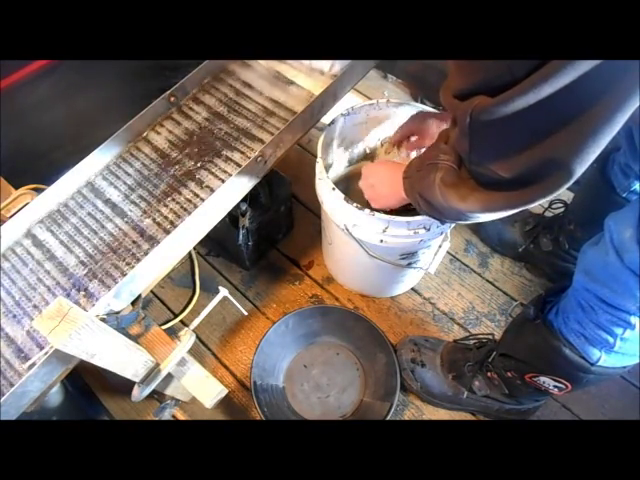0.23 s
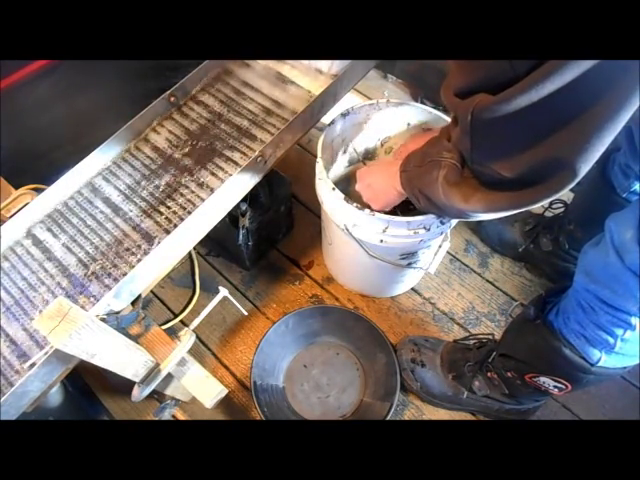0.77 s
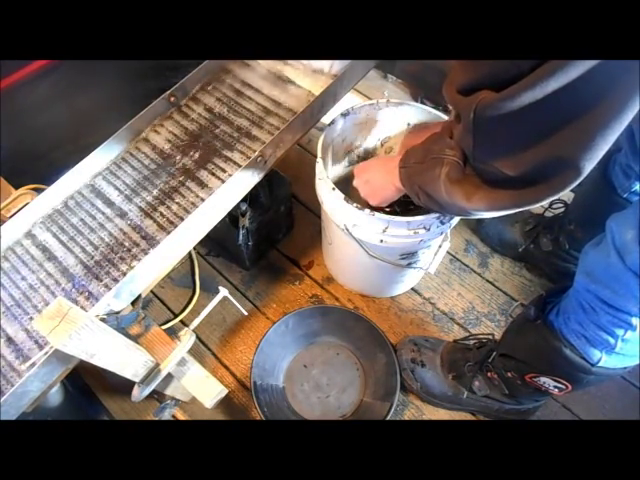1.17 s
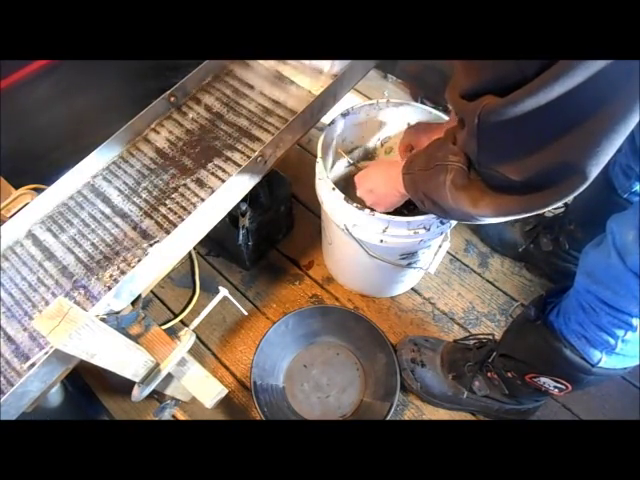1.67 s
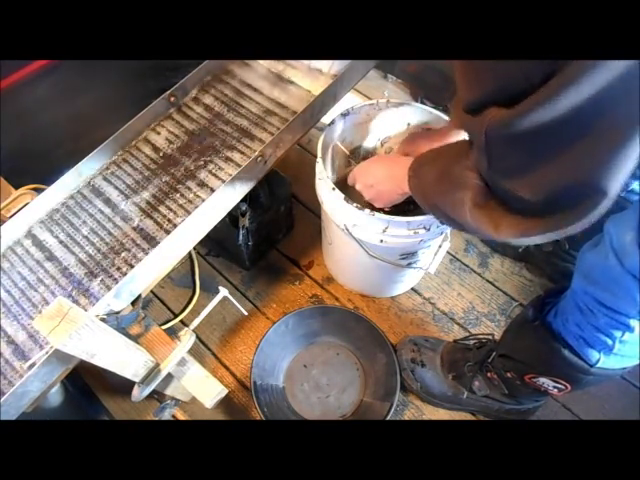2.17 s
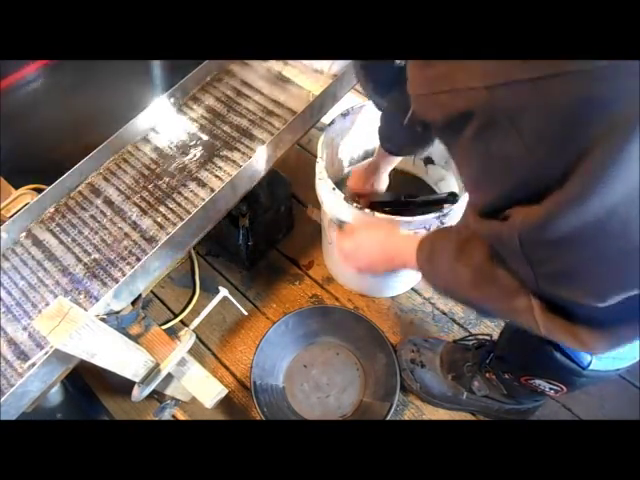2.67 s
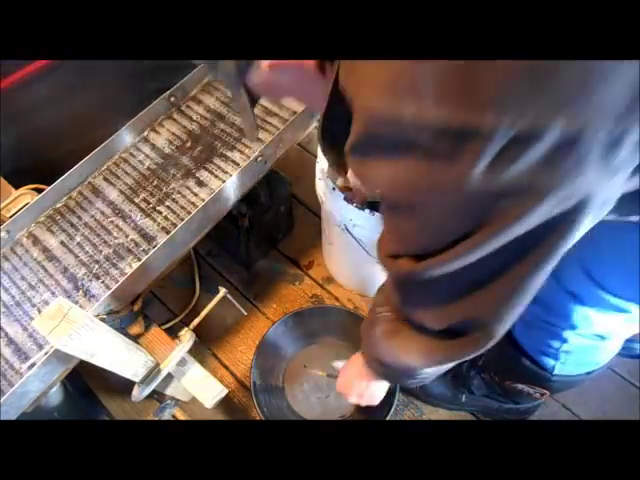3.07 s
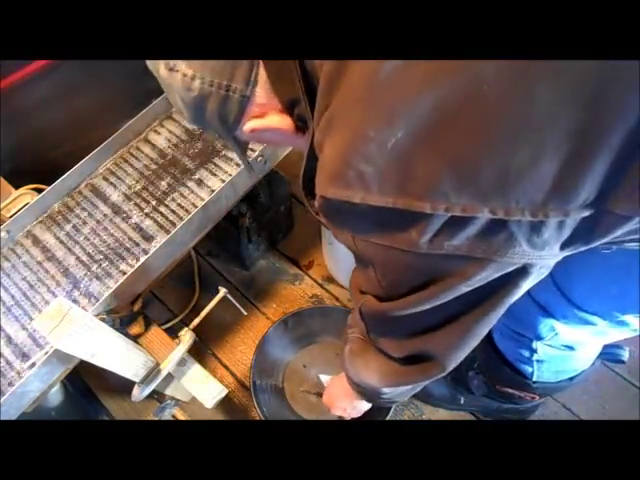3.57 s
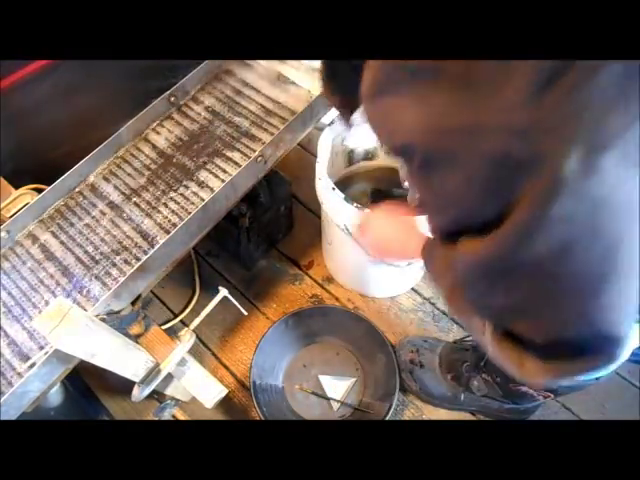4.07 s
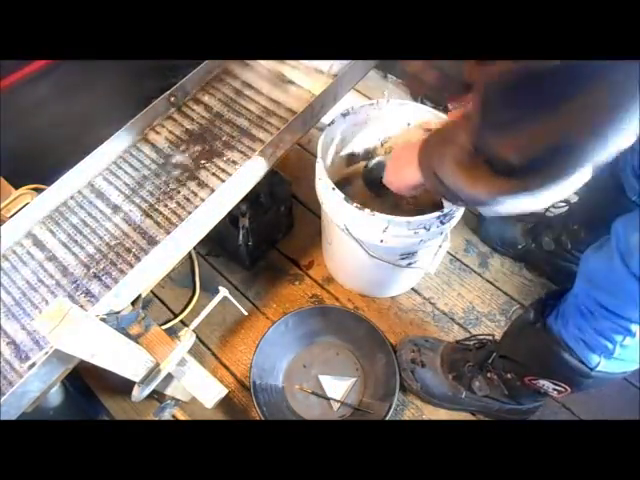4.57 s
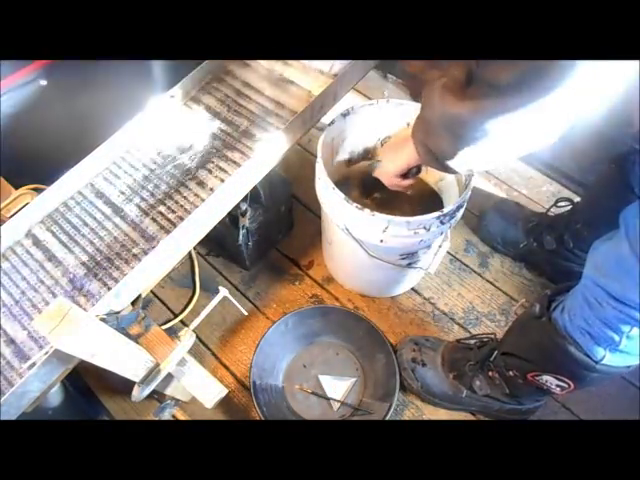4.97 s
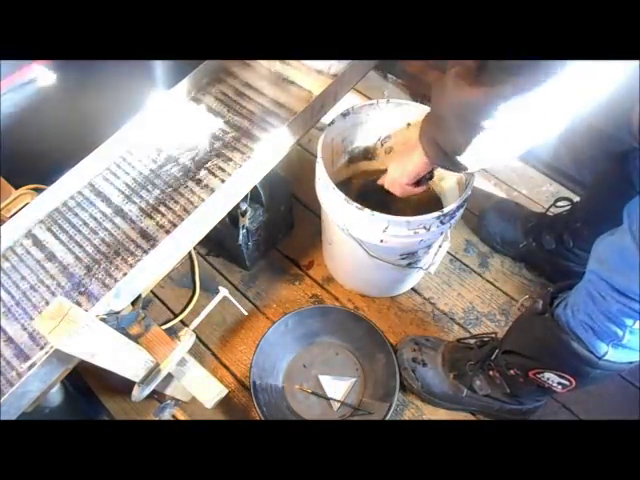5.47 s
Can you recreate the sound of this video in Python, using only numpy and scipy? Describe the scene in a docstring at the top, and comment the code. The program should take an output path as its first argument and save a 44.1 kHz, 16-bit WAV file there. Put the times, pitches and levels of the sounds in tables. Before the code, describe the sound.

Water rushes steadily down a metal sluice while a hand stirs gravel in a bucket, then a tool clacks sharply into a pan.

```python
"""Water rushes down a metal sluice over riffles: coloured noise and tiny bubbles, with resonances and gurgling.
A hand works gravel in a bucket: pebbles click as dying sines, bubbles and plops ring with rising pitch,
and noise bursts slosh and splash. A metal tool drops in a pan and both ring in their modes; boots and
boards thump, and a pump hums. One microphone hears it all; automatic gain pulls everything down
after each peak, holds, then recovers."""
import sys
import numpy as np
from scipy import signal
from scipy.io import wavfile
from scipy.ndimage import uniform_filter1d, minimum_filter1d

SR = 44100
rng = np.random.default_rng(int(sys.argv[2]) if len(sys.argv) > 2 else 0)


def master_out(mix):
    """Clip the mix to full scale and print it as 16-bit PCM to the path in sys.argv[1]."""
    frames = np.transpose(np.atleast_2d(mix))
    ceiling = np.clip(frames, -1, 1)
    pcm = np.round(ceiling * 32767).astype(np.int16)
    wavfile.write(sys.argv[1], SR, pcm)


N = 252119  # length in samples

# Level of the rush before the automatic gain, and its treble tilt.
# Each row: time in seconds, level in dB, treble tilt in dB.
FLOW = [(0, 2.5, -1), (.3, 3.5, 2.5), (.55, 0, 1.5), (0.9, 2.5, -1), (1.25, -1, 3), (1.6, -1, -0.5),
        (2.1, 0.2, 2), (2.4, 2.5, -0.5), (3.1, 0.9, 1.5), (3.45, 2, -0.5), (3.6, 3, -1), (3.8, 5, -0.5),
        (3.92, 3, -4.5), (4.2, 1.5, 0), (4.95, 2.2, 0), (5.15, 3, -0.5), (5.45, -2, 3.5), (5.72, 0.5, -3)]


def gain_of(db):
    """Decibels are logarithmic: 20 dB is a factor of ten in amplitude."""
    return 10 ** (np.asarray(db) / 20)


def evened(x):
    """Normalization by the root mean square sets the rms to 1."""
    return x / np.sqrt(np.mean(x ** 2) + 1e-20)


def add(mix, s, sound):
    """Superposition: a sound starting at s seconds adds to the mix."""
    part = mix[round(s * SR):][:len(sound)]
    part += sound[:len(part)]


def ring(hz, db, t60, rise=0.00022, glide=0.):
    """Damped oscillation: falls 60 dB in t60 (s), soft start; glide is the fractional pitch rise over t60."""
    t = np.arange(int(SR * .3)) / SR
    turns = hz * (t + glide * t ** 2 / (2 * t60))
    decay = gain_of(db - 60 * t / t60)
    onset = 1 - np.exp(-t / rise)
    return decay * onset * np.sin(2 * np.pi * turns)


def resonate(x, hz, width):
    """Second-order resonance: one band of the given width in Hz passes, at rms 1."""
    b, a = signal.iirpeak(hz, hz / width, SR)
    return evened(signal.lfilter(b, a, x))


def wander(hz):
    """Low-pass noise: averaging twice over 1/hz seconds leaves a slow random drift of rms 1."""
    points = int(SR / hz)
    once = uniform_filter1d(rng.standard_normal(N), points)
    return evened(uniform_filter1d(once, points))


def rush(level_db=-15.5, patchy_db=1.5, flicker_db=0.52, droplet_share=0.15):
    """Spectral shaping: noise and droplets share one colour, with drifting patches and flickering treble."""
    # Colour of the rush. Each row: frequency in Hz, relative level in dB.
    colour = [(15, -17), (25, -13), (59, -24.5), (91, -20), (177, -24), (253, -17), (420, -10), (698, -7),
              (1280, -3.5), (2820, -0.5), (4500, -2.5), (6100, -4.5), (7300, -4), (10000, -5),
              (12000, -6.5)]
    share = np.clip(droplet_share, 0, 1)  # share of the power
    drive = np.sqrt(1 - share) * rng.standard_normal(N) + np.sqrt(share) * droplets()
    hz, t, z = signal.stft(drive, SR, nperseg=1024, noverlap=896)
    mean_power = (abs(z) ** 2).mean(1)
    z /= uniform_filter1d(np.sqrt(mean_power), size=9)[:, None]  # whiten

    across_hz = uniform_filter1d(rng.standard_normal(z.shape), 12, 0)
    patches = evened(uniform_filter1d(across_hz, 18, 1))
    flicker = evened(uniform_filter1d(rng.standard_normal(len(t)), size=8))
    flicker_reach = (hz / (hz + 1000))[:, None]

    f, colour_level_db = np.transpose(colour)
    colour_db = np.interp(np.log(hz + 1), np.log(f), colour_level_db)[:, None]
    s, _, treble_db = np.transpose(FLOW)
    treble_reach = (hz ** 2 / (hz ** 2 + 3500 ** 2))[:, None]
    colour_db = colour_db + np.interp(t, s, treble_db) * treble_reach
    z *= gain_of(colour_db + patchy_db * patches + flicker_db * flicker * flicker_reach)
    shaped = signal.istft(z, SR, nperseg=1024, noverlap=896)[1][:N]
    return gain_of(level_db) * evened(shaped)


def droplets(per_s=3000, spread_db=2.5, cycles=4.8):
    """Shot noise: dense tiny bubbles of many pitches, each a few cycles long, add to a flat spectrum."""
    struck = rng.random(N) < per_s / SR
    size = gain_of(spread_db * np.minimum(rng.exponential(1, N), 5)) * struck
    kind, out = rng.integers(0, 30, N), np.zeros(N)
    for k, hz in enumerate(np.geomspace(450, 10500, num=30)):
        grain = ring(hz, 0, 2 * cycles / hz, rise=1 / hz, glide=0.37)[:3000]
        grain = grain / np.linalg.norm(grain) * np.sqrt(hz)  # equal power per Hz
        out += signal.oaconvolve(size * (kind == k), grain)[:N]
    return evened(out)


def hollows(gurgle_db=0.5):
    """Flow-excited resonance: gusty turbulence stirs the air in trough and pipe, whose tones waver."""
    # Air resonances. Each row: frequency in Hz, width in Hz, level in dB relative to that of the water.
    air_modes = [(250.3, 12, -49.5), (329, 75, -47), (468.2, 11.5, -40), (527, 10, -43.5), (869.7, 49, -34),
                 (2800, 640, -29.5)]
    out = np.zeros(N)
    for hz, width, db in air_modes:
        gusts = gain_of(db + gurgle_db * wander(52))
        out += gusts * resonate(rng.standard_normal(N), hz, width)
    return out


def gurgle(count=500, db=-33, spread_db=3.0):
    """Bubble resonance: larger bubbles at random times climb in pitch as they surface."""
    out = np.zeros(N)
    for start, pitch, size, length in rng.random((count, 4)):
        hz = 420 * 4.5 ** pitch
        t60 = (25 + 50 * length) / hz
        level_db = db - spread_db * np.log(size + 0.0067)  # few are loud
        add(out, start * N / SR, ring(hz, level_db, t60, rise=0.004, glide=0.21))
    return out


def pebbles(t60=0.0051, overtone=1.595, overtone_db=-5.5, grit_db=-22.5, grit_t60=.049):
    """Impact: each click is two strongly damped modes, followed by the noise of grit settling."""
    # Pebble clicks. Each row: start in seconds, level in dB, frequency in Hz.
    clicks = [(.526, -3, 2820), (.543, 8, 4600), (1.148, -0.5, 3230), (1.277, 4.5, 4170),
              (1.397, -1.5, 5890), (2.959, -3, 3000), (5.01, 0.9, 4200), (5.117, -3.5, 2760),
              (5.341, -2, 4150)]
    out, t = np.zeros(N), np.arange(2000) / SR
    for s, db, hz in clicks:
        add(out, s, ring(hz, db, t60) + ring(overtone * hz, db + overtone_db, t60))
        grit = np.gradient(rng.standard_normal(size=len(t)))  # differencing favours treble
        add(out, s, gain_of(db + grit_db - 60 * t / grit_t60) * grit)
    return out


def bubbles(cycles=103):
    """Damped resonance: a fixed count of swings until 60 dB down, so high tones die sooner."""
    # Loud bubbles and plops; those near 865 Hz ring the hollow of the trough.
    # Each row: start in seconds, level in dB, starting frequency in Hz.
    plops = [(.33, -15, 790), (.39, -14.5, 860), (.49, -19, 864), (.9, -17.5, 1020), (.96, -13, 880),
             (1.05, -18, 858), (1.164, -5, 2690), (1.232, -17, 877), (1.6, -16.5, 811), (1.74, -18, 868),
             (1.86, -18, 848), (2.11, -21, 702), (2.67, -17.5, 755), (2.75, -20.5, 528), (2.87, -17.5, 742),
             (3.59, -3, 3680), (3.645, -7, 2104), (4.45, -15.5, 1070), (4.94, -15.5, 937), (5.58, -21, 687),
             (5.648, -7, 3030), (5.673, -8, 3000)]
    out = np.zeros(N)
    for s, db, hz in plops:
        add(out, s, ring(hz, db, cycles / hz, rise=0.0021, glide=0.092))
    return out


def sloshes():
    """Turbulent noise: water sloshing in the bucket swells and fades as high-passed noise."""
    # Sloshes. Each row: middle in seconds, half length in seconds, level in dB, low edge in Hz.
    swells = [(0.952, 0.036, -13.5, 1000), (1.983, 0.011, -13.5, 2000), (2.582, 0.045, -15, 1500),
              (4.333, 0.028, -10, 1490), (4.426, 0.026, -13.5, 1000), (4.838, 0.082, -8, 3000),
              (5.127, 0.014, -15.5, 1500), (5.224, 0.047, -11, 3500), (5.692, 0.074, -12.5, 1950)]
    out, t = np.zeros(N), np.arange(N) / SR
    for s, half, db, edge_hz in swells:
        b, a = signal.butter(2, edge_hz, "high", fs=SR)
        spray = signal.lfilter(b, a, rng.standard_normal(N))
        out += gain_of(db + 0.54 * wander(400)) * np.exp(-((t - s) / half) ** 2) * spray
    return out


def splashes(t60=0.17, width=0.74):
    """Band-limited noise bursts: each sudden grainy spatter dies away; width is a share of the centre."""
    # Small splashes. Each row: start in seconds, level in dB, centre frequency in Hz.
    bursts = [(.143, -12, 4160), (.225, -14, 4500), (.251, -18, 3330), (.312, -13.5, 3810),
              (1.017, -16, 4150), (1.541, -18, 4600), (2.362, -17.5, 4100), (3.016, -13, 4960),
              (3.291, -15, 3630), (3.691, -10.5, 3100), (4.144, -12.5, 3000), (4.268, -16, 4500),
              (4.515, -14.5, 4770), (4.558, -13, 3480)]
    out, t = np.zeros(N), np.arange(6000) / SR
    for s, db, hz in bursts:
        noise, grain = rng.standard_normal((2, len(t)))
        grain_db = 2.83 * evened(uniform_filter1d(grain, size=90))
        spatter = resonate(noise, hz, width * hz) * gain_of(grain_db)
        add(out, s, gain_of(db - 60 * t / t60) * spatter)
    return out


def dropped_tool(tool_db=-0.5):
    """Modal excitation: each contact snaps, cracks and rings the pan's modes in new proportions."""
    # Modes of the tool. Each row: frequency in Hz, level in dB, time to fall 60 dB in seconds.
    tool_modes = [(4226, -8.5, .27), (4300, -13, .12), (5558, 2, .09), (5640, -9, .2), (5697, -8, .4),
                  (5747, -8, .36), (8027, -7, .15), (8845, -8, .14), (9674, -14, .1)]
    # Modes of the pan under it. Each row: frequency in Hz, relative level in dB, 60 dB decay in seconds.
    pan_modes = [(790, -20, 0.096), (1040, -17, 0.055), (1112, -12, .09), (1236, -12, 0.06),
                 (1343, -4, 0.1), (1540, -15, .05), (1850, -15, 0.054), (2050, -12, 0.044),
                 (2400, -8, 0.054), (2610, -5, 0.09), (2760, -13, 0.08), (3235, -15, 0.061),
                 (3430, -16, .06)]
    # Contacts of tool and pan, first dropped, then pressed down and scraped.
    # Each row: start in seconds, pan level in dB, crack level in dB, snap drive in dB before differencing.
    contacts = [(3.479, -9.5, -2.5, 4), (3.488, -12.5, -1, 0), (3.497, -9, -21, -11), (3.7451, -4, -3, 23),
                (3.749, -3, -0.5, 2), (3.756, -1.5, -2, 2), (3.764, -1.5, 0, 1), (3.774, -10, -16, 0)]
    out, t = np.zeros(N), np.arange(3000) / SR
    first_blow = contacts[0][0]  # only this rings the tool; after that it lies damped
    for hz, db, t60 in tool_modes:
        add(out, first_blow, ring(hz, db + tool_db, t60))
    out *= 1 + 0.21 * wander(170)  # it chatters as it rings

    b, a = signal.butter(2, 600, "high", fs=SR)
    for s, pan_db, crack_db, snap_db in contacts:
        weights = rng.standard_normal(len(pan_modes))  # random weights vary the pan's modes at each contact
        for (hz, db, t60), weight in zip(pan_modes, weights):
            add(out, s, ring(hz, db + pan_db + 2.3 * weight, t60))
        crack = signal.lfilter(b, a, rng.standard_normal(len(t)))
        add(out, s, gain_of(crack_db - 60 * t / .085) * crack)
        snap = ring(3000, snap_db, .0012, rise=.00003)
        add(out, s, np.gradient(snap))
    return out


def deck(thump_t60=0.16):
    """Damped low modes: knocks and shifting weight sound dull, and loose boards shake unevenly."""
    # Modes of the deck boards. Each row: frequency in Hz, relative level in dB, 60 dB decay in seconds.
    board_modes = [(103, -9, 0.11), (230, -6, 0.13), (311, 0.5, 0.14)]
    # The pan rocking on the boards. Each row: start in seconds, force in dB.
    rocks = [(3.79, -20), (3.805, -11.5), (3.835, -9.5)]
    # Thumps of weight shifting on the deck. Each row: start in seconds, level in dB, frequency in Hz.
    thumps = [(3.48, -32, 109), (4.835, -28, 75.6), (4.88, -31, 45), (5.26, -30.5, 60), (5.27, -30, 300),
              (5.47, -31, 74.4), (5.51, -35, 80)]
    out = np.zeros(N)
    for s, force_db in rocks:
        for hz, db, t60 in board_modes:
            add(out, s, ring(hz, db + force_db, t60, rise=0.0046))
    for s, db, hz in thumps:
        add(out, s, ring(hz, db, thump_t60, rise=0.0051))
    return out * (1 + 0.25 * wander(43))


def pump(hum_hz=92, hum_db=-51.5):
    """Frequency and amplitude modulation: a steady tone wavers slightly in pitch and level."""
    turns = np.cumsum(hum_hz * (1 + 0.02 * wander(11))) / SR
    level = gain_of(hum_db + 1.0 * wander(13))
    return level * np.sqrt(2) * np.sin(2 * np.pi * turns)  # root 2 makes the level an rms


def scene():
    """Superposition: all sounds add at one microphone, heard alike in both channels."""
    s, level_db, _ = np.transpose(FLOW)
    water_level = gain_of(np.interp(np.arange(N) / SR, s, level_db))
    water = water_level * (rush() + hollows() + gurgle())
    bucket = pebbles() + bubbles() + sloshes() + splashes()
    mono = water + bucket + dropped_tool() + deck() + pump()
    return np.array([mono, mono])


def record(dry, limit_db=-8.5, start_db=9., deepest_db=10.0, recover_db=17.0, hold=0.13, lag=0.031):
    """Automatic gain: it follows peaks late (lag, s), holds (s), recovers (dB/s); the rest clips, then low-pass."""
    power = abs(uniform_filter1d(dry[0] ** 2, size=20))
    peak_db = 10 * np.log10(power + 1e-12) - limit_db
    peak_db = np.minimum(peak_db, deepest_db)  # the cut goes no deeper than this
    peak_db[0] = start_db  # still recovering from an earlier peak
    rise = np.arange(N) * recover_db / SR
    over_db = np.maximum.accumulate(peak_db + rise) - rise  # falls steadily after each peak
    held = int(hold * SR)
    over_db = -minimum_filter1d(-over_db, held, origin=(held - 1) // 2)  # running maximum
    r = np.exp(-1 / (lag * SR))
    cut_db = signal.lfilter([1 - r], [1, -r], np.maximum(over_db, 0), zi=[r * start_db])[0]
    clipped = np.clip(dry / gain_of(cut_db), -1, 1)
    low_pass = signal.firwin(141, 10500, window=("kaiser", 8), fs=SR)  # band edge in Hz
    return signal.oaconvolve(clipped, low_pass[None], "same")


dry = scene()
out = record(dry)
master_out(out)
```